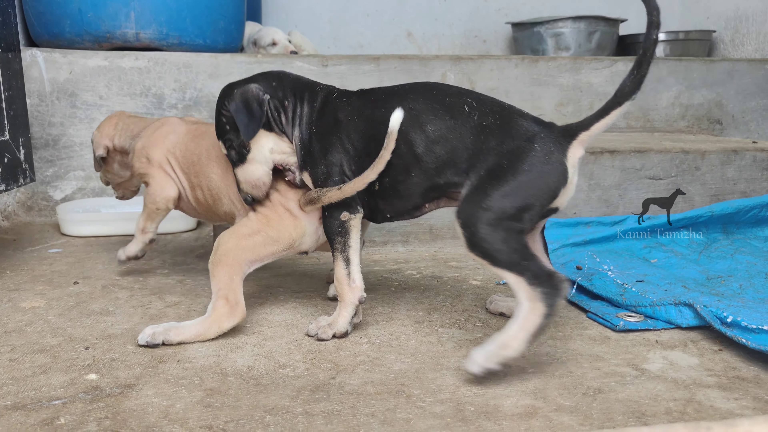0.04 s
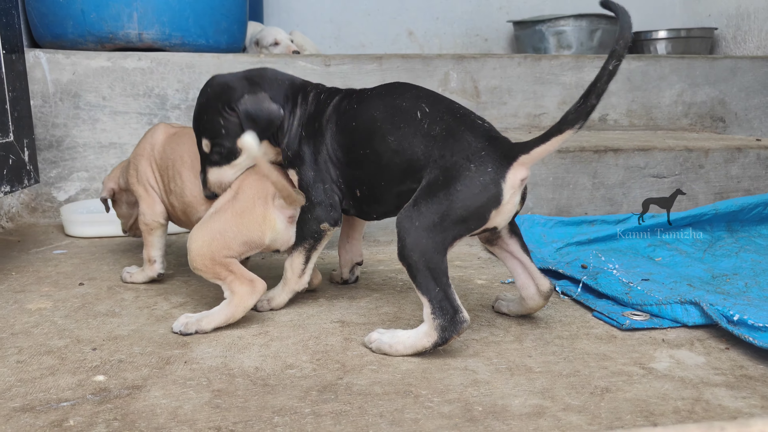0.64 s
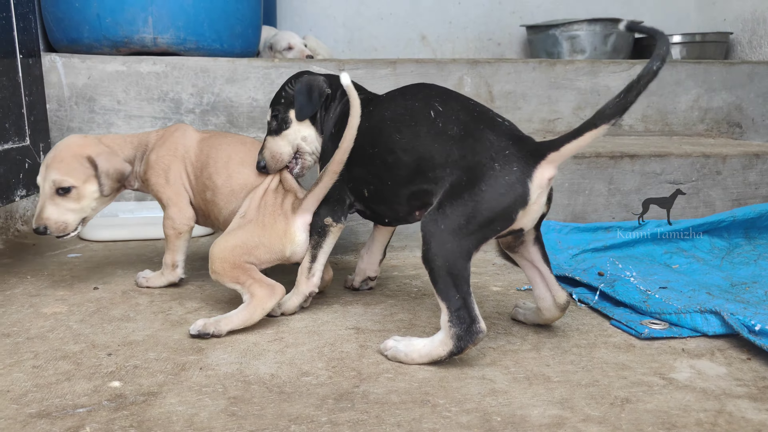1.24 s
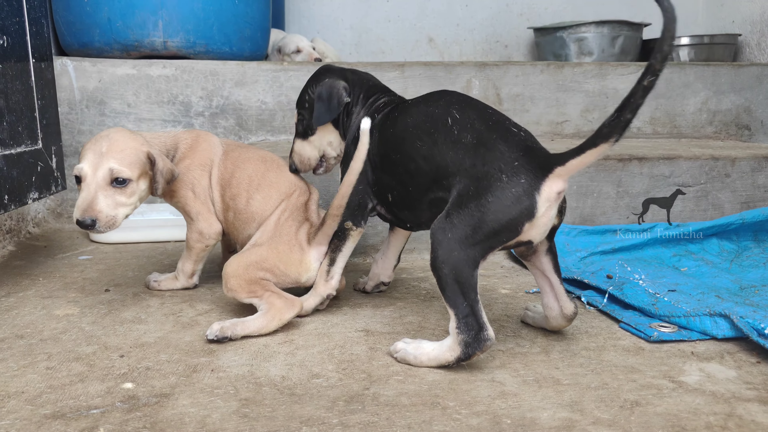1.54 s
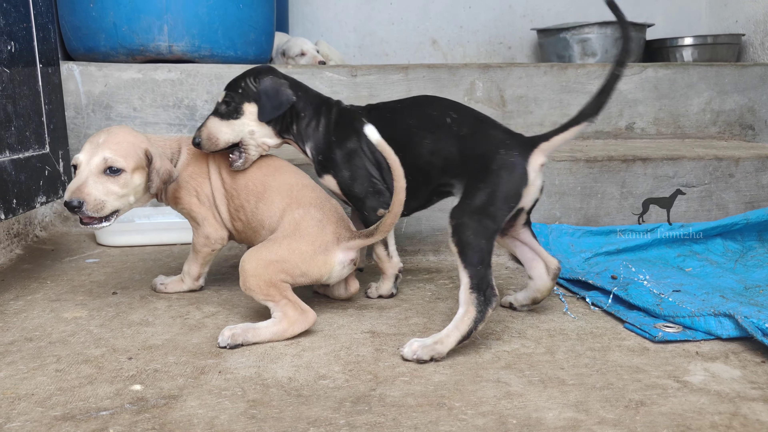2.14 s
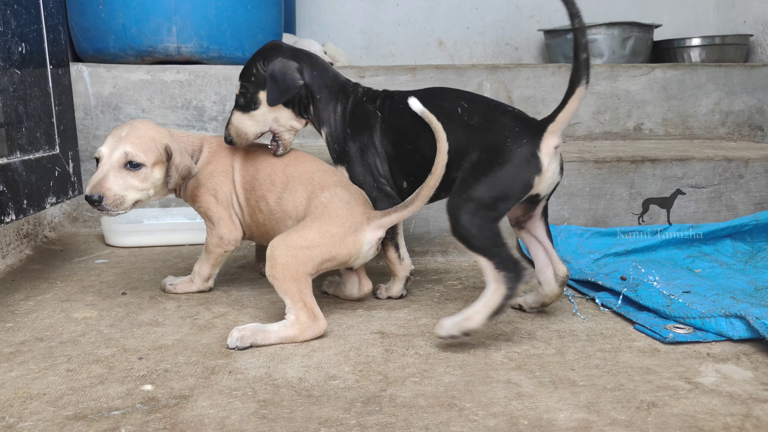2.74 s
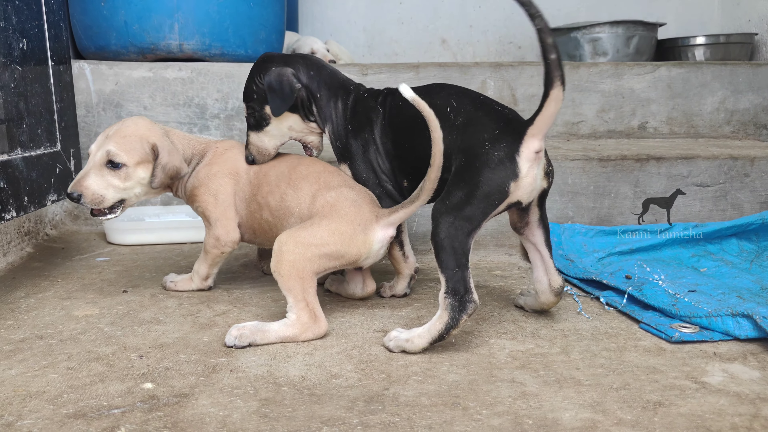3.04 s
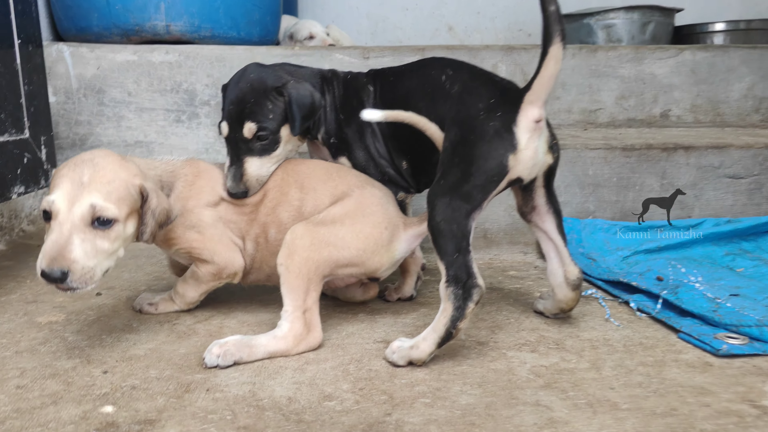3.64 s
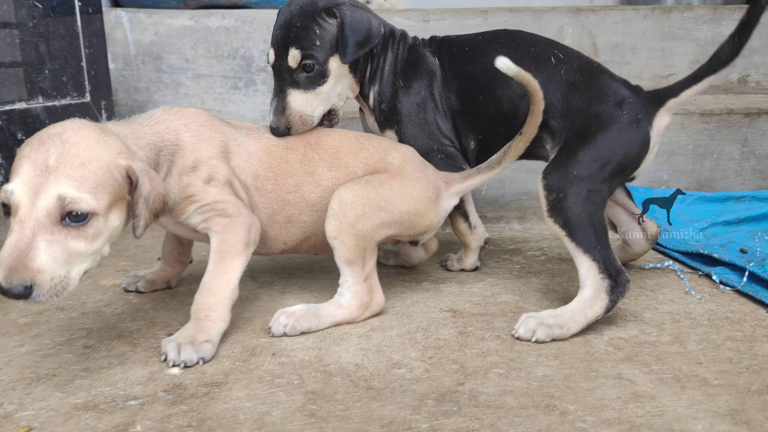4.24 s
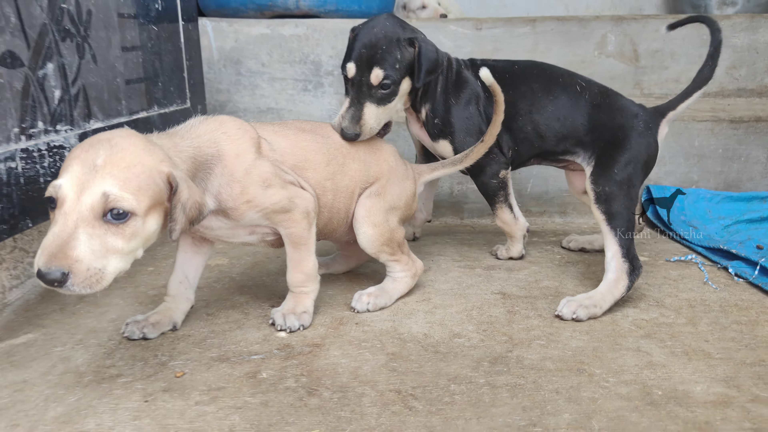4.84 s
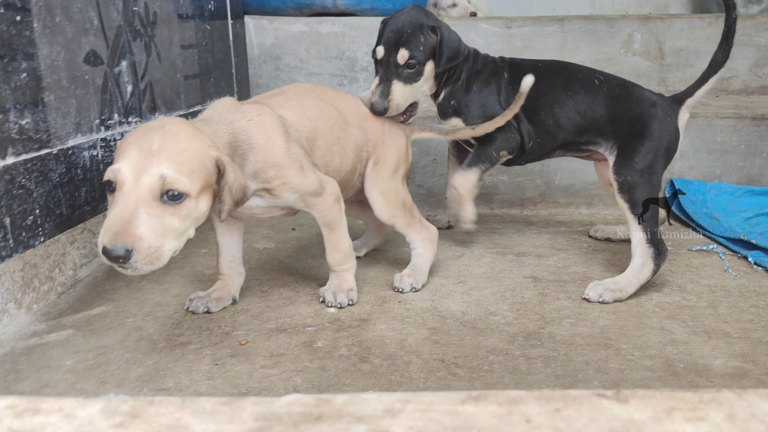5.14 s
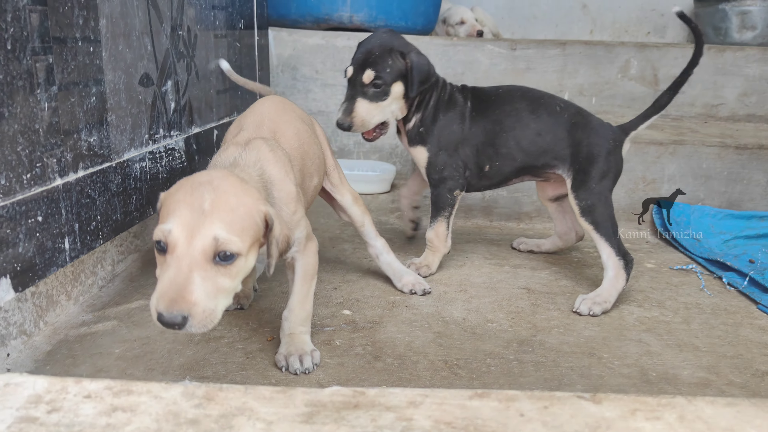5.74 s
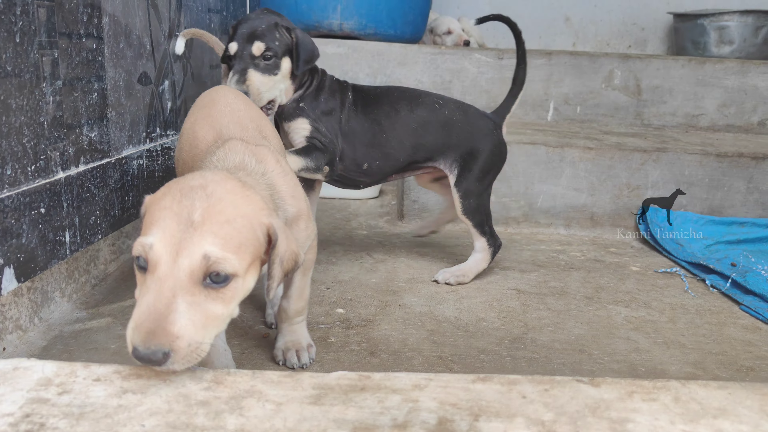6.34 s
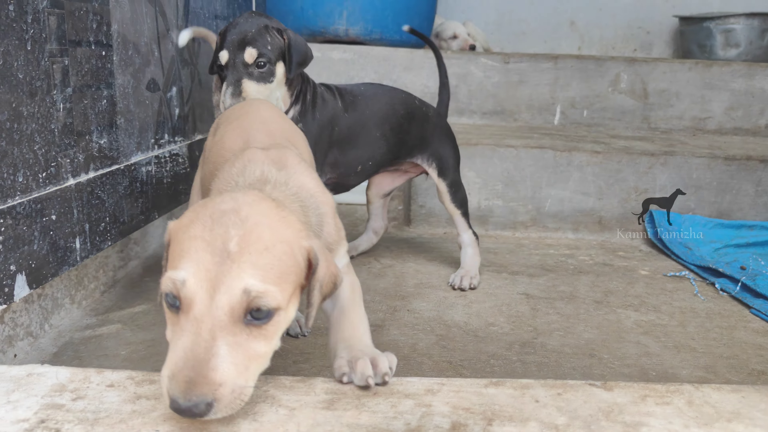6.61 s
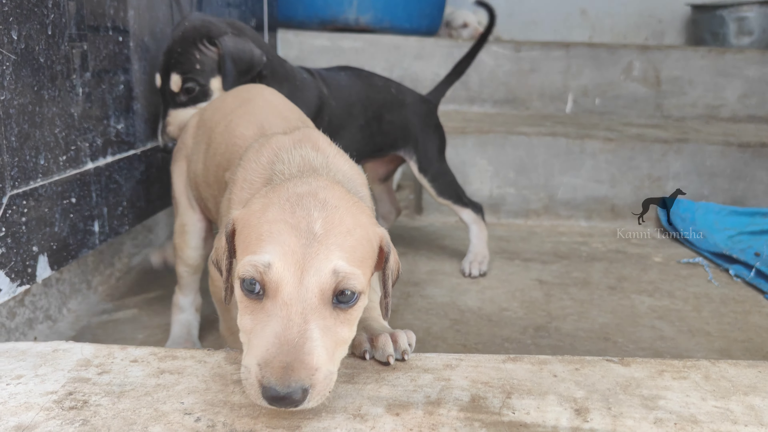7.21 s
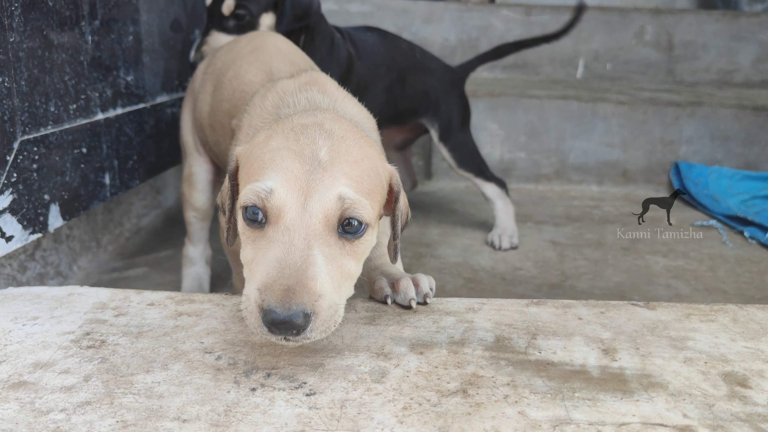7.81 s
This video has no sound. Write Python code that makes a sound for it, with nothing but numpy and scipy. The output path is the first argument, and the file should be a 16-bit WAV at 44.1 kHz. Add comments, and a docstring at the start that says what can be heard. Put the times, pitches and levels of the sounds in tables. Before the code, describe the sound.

Puppies wrestle close to the microphone in a small walled yard. One protests in about a dozen short calls: shrill, rasping yaps first, then a growl, a yelp and a bark, and finally a run of lower growls, the last one louder. Claws tick and paws scuff lightly on the concrete now and then. The bare walls ring briefly after each sound, over a faint rumble and hiss.

```python
"""A small walled yard with a concrete floor: two puppies wrestle close to a two-port microphone.
One protests in a dozen calls, shrill rasping yaps at first, then lower growls. Its vocal folds and
puffs of breath are the source; chest, pharynx, mouth and muzzle are the filters. Claws tick by impact
and paws scuff by friction. The bare walls ring after every sound, over a faint rumble and hiss."""
import sys
import numpy as np
from scipy import signal
from scipy.fft import rfft, irfft
from scipy.io import wavfile
from scipy.ndimage import uniform_filter1d, minimum_filter1d

SR = 44100
rng = np.random.default_rng(int(sys.argv[2]) if len(sys.argv) > 2 else 0)


def persist_wave(psi):
    """Save psi, clipped to +-1, as 16-bit WAV."""
    counts = np.round(np.clip(psi, -1, 1) * 32767).astype(np.int16)
    wavfile.write(sys.argv[1], SR, np.atleast_2d(counts).T)


N = 347067


def amp(db):
    """Decibels to amplitude ratio."""
    return 10 ** (np.asarray(db) / 20)


def unit(x):
    """Normalisation to rms 1."""
    return x / np.sqrt(np.mean(x ** 2) + 1e-20)


def steady(x, size=1100):
    """Normalisation by a running rms, too slow to flatten single pulses."""
    return x / np.sqrt(uniform_filter1d(uniform_filter1d(x ** 2, size), size) + 1e-14)


def wobble(length, size):
    """Low-passed noise: a smooth wandering of rms 1."""
    return unit(uniform_filter1d(uniform_filter1d(rng.standard_normal(length), size), size))


def read(points, hz):
    """Interpolation on a log-frequency axis."""
    f, value = np.transpose(points)
    return np.interp(np.log(hz + 1), np.log(f + 1), value)


def add(mix, start_s, sound):
    """Superposition of a sound on the mix."""
    part = mix[max(round(start_s * SR), 0):][:len(sound)]
    part += sound[:len(part)]


def colour(x, points, size=2048):
    """Minimum-phase filter with the given spectrum."""
    log_gain = np.log(amp(read(points, abs(np.fft.fftfreq(size, 1 / SR)))))
    taps = np.fft.ifft(np.exp(np.conj(signal.hilbert(log_gain)))).real
    return signal.oaconvolve(x, taps[:size // 2])[:len(x)]


def cut(x, hz, kind, order=4):
    """Maximally flat low-pass or high-pass."""
    return signal.sosfilt(signal.butter(order, hz, kind, fs=SR, output="sos"), x)


def resonate(x, hz, width_hz):
    """Damped resonator of gain 1, whose centre frequency may move."""
    turn = np.exp(2j * np.pi * np.cumsum(hz * np.ones(len(x))) / SR)
    pole = np.exp(-np.pi * width_hz / SR)
    return 2 * (turn * signal.lfilter([1 - pole], [1, -pole], x / turn + 1e-18)).real


def bursts(impulses, decay_s):
    """Exponential decay: each impulse starts a fading burst of noise."""
    envelope = signal.lfilter([1], [1, -np.exp(-1 / (decay_s * SR))], impulses)
    return envelope * rng.standard_normal(len(impulses))


def train(place, force, size):
    """Band-limited impulses: windowed sincs can fall between samples."""
    near = place.astype(int)[:, None] + np.arange(-7, 9)
    offset = near - place[:, None]
    clicks = force[:, None] * np.sinc(offset) * np.sinc(offset / 8)
    return unit(np.bincount(np.clip(near, 0, size - 1).ravel(), clicks.ravel(), size))


# Diffuse sound at the two ports. Each row: frequency in Hz, left-right correlation.
COHERENCE = [(30, 0.28), (130, 0.99), (200, 0.86), (400, 0.9), (800, 0.48), (1400, 0), (16000, 0.48)]


def diffuse(size):
    """Spatial coherence: close ports hear long waves more alike than short ones."""
    common, separate = rfft(rng.standard_normal((2, size)))
    same = np.clip(read(COHERENCE, np.fft.rfftfreq(size, 1 / SR)), -1, 1)
    return irfft(np.array([common, same * common + np.sqrt(1 - same ** 2) * separate]), size)


# Outdoor background. Each row: frequency in Hz, relative spectral density in dB.
AIR_SPECTRUM = [(15, -31.5), (25, -5.5), (70, -6.5), (134, -18), (161, -7), (249, -14), (354, -20),
                (416, -31), (531, -21), (936, -35.5), (2550, -30), (2840, -32.5), (3520, -29.5),
                (16000, -50)]
# Its slow drift. Each row: time in seconds, hiss gain in dB, rumble gain in dB.
AIR_DRIFT = [(0, 2, -3), (1.2, 2, -4.5), (2, 7.5, 5.5), (2.6, 3, -3), (3.7, 8.5, -1.5), (5, 0.5, -1.5),
             (5.9, 1, 1), (7.3, 0.5, 2)]


def air(level_db=-56.5, crossover_hz=900):
    """Ambient noise: a diffuse field whose rumble and hiss drift separately."""
    hz = np.fft.rfftfreq(N, 1 / SR)
    noise = unit(irfft(rfft(diffuse(N)) * amp(read(AIR_SPECTRUM, hz)), N))
    hiss = irfft(rfft(noise) * hz ** 4 / (hz ** 4 + crossover_hz ** 4), N)
    rumble = noise - hiss
    when, *levels = np.transpose(AIR_DRIFT)
    hiss_db, rumble_db = (np.interp(np.arange(N) / SR, when, level) for level in levels)
    return amp(level_db) * (amp(hiss_db) * hiss + amp(rumble_db) * rumble)


# The yard's ring. Each row: frequency in Hz, time to fall 60 dB in seconds.
REVERB_TIMES = [(150, 0.35), (300, 0.45), (700, 0.36), (2000, 0.38), (5000, 0.34), (9000, 0.17),
                (15000, 0.44)]
# Floor and near walls. Each row: left delay in seconds, right delay in seconds, relative gain.
REFLECTIONS = [(.0013, 0.0017, 1), (.0041, .0047, 0.58), (.0079, 0.0089, 0.87), (0.0099, .0114, 0.15),
               (0.017, .0172, 0.23)]


def yard(x, send, tail_db=-2.5, walls_db=-1, build_s=0.0064, port_lag_s=0.00014):
    """Reverberation: x arrives directly, left port first; send feeds reflections and a diffuse tail."""
    hz, t, spectra = signal.stft(diffuse(SR), SR, nperseg=256)
    decay = amp(-60 * t / read(REVERB_TIMES, hz)[:, None])
    tail = signal.istft(spectra * decay, SR, nperseg=256)[1][:, :SR]
    tail *= 1 - np.exp(-(np.arange(SR) / SR / build_s) ** 2)
    response = amp(tail_db) * tail / np.linalg.norm(tail[0])
    for left, right, gain in REFLECTIONS:
        response[[0, 1], [round(left * SR), round(right * SR)]] += gain * amp(walls_db)
    direct = np.array([x, np.pad(x, (round(port_lag_s * SR), 0))[:N]])
    return 0.78 * direct + signal.fftconvolve(send[None], response, axes=1)[:, :N]


# Claws on concrete. Each row: time in seconds, relative peak in dB, resonance in Hz.
CLAW_TICKS = [(0.4194, -34, 4270), (0.7811, -39, 5370), (0.833, -43, 7000), (3.5294, -72.5, 4300),
              (4.339, -34, 3020), (4.958, -47, 2185), (5.022, -51, 1916), (5.1374, -20.5, 2570),
              (6.464, -29, 4410), (6.6017, -47, 5750), (7.256, -39.5, 1234)]
# The spectrum of a tick. Each row: frequency in Hz, gain in dB.
CLAW_SPECTRUM = [(100, -16), (450, 0), (800, -17.5), (1400, -5), (2900, -3.5), (4500, -2), (7000, -6),
                 (10000, -13.5), (15000, -8.5)]
# Sliding pads. Each row: start in seconds, length in seconds, relative level in dB.
PAD_SCUFFS = [(0.796, .12, -58.5), (3.501, 0.22, -53.5), (4.149, 0.24, -44.5), (4.825, .13, -73.5),
              (6.452, 0.12, -46.5), (7.183, 0.27, -57)]


def paws(tick_s=0.0063, claw_db=-1, scuff_db=-2, grain_db=4, patter_db=-53, patter_per_s=4):
    """Impact and friction: claws strike the concrete and pads drag grit over it."""
    out, t = np.zeros(N), np.arange(2048) / SR
    for start, db, hz in CLAW_TICKS:
        impact = colour(rng.standard_normal(len(t)) * np.exp(-t / tick_s), CLAW_SPECTRUM)
        tick = .5 * impact + resonate(impact, hz, width_hz=1700)
        add(out, start, amp(db + claw_db) * tick / abs(tick).max())
    grains = rng.standard_normal(N) * amp(grain_db * np.minimum(rng.exponential(1, N), 5))
    grit = unit(colour(grains, [(100, -13.5), (600, -9), (2000, -7.5), (4500, -5.5), (7000, -9),
                                (10000, -22), (15000, -19)]))
    for start, length, db in PAD_SCUFFS:
        progress = np.clip((np.arange(N) / SR - start) / length, 0, 1)
        out += amp(db + scuff_db) * grit * np.sin(np.pi * progress)
    # tiny bright ticks as the pups shift their feet
    touches = (rng.random(N) < patter_per_s / SR) * rng.random(N)
    return out + amp(patter_db) * cut(bursts(touches, tick_s), 6000, "high", order=2)


def vocal_folds(hz, rough, jitter=.06, shimmer=1.0, subharmonic=0.25, waver=.04, rattle=0.88):
    """Glottal source: one flow pulse and one closing snap a cycle, uneven when the voice is rough."""
    size = len(hz)
    turns = .9 + np.cumsum(hz * (1 + waver * rough * wobble(size, 200))) / SR
    cycle = np.arange(1, int(turns[-1]))
    late, strong = rng.standard_normal((512, 2))[cycle].T
    cycle_rough = np.interp(cycle, turns, rough)
    place = np.interp(cycle + jitter * cycle_rough * late, turns, np.arange(size))
    force = np.exp(cycle_rough * (shimmer * np.clip(strong, -2, 1.4) + subharmonic * (-1) ** cycle))
    # strong cycles close harder, so the treble rattles
    return turns, train(place, force, size), train(place, force ** rattle, size)


# Upper resonances of throat and muzzle with the mouth nearly shut, half open and wide.
# Each row: frequency in Hz, relative gain in dB.
MUZZLE_SHUT = [(1800, -3), (2100, -8), (2600, -23), (3400, -18), (4400, 6.5), (5900, -3.5), (7300, 2),
               (8600, -7), (9300, -8), (10200, -20), (15500, -16.5)]
MUZZLE_HALF = [(1800, -23), (2200, -1), (2600, -12.5), (3200, -6.5), (3700, -1), (4500, 0), (5300, -2.5),
               (5900, -1), (6600, -7.5), (7800, -13), (8800, -29.5), (12000, -37.5), (15500, -27)]
MUZZLE_WIDE = [(1800, -39.5), (2250, -2.5), (2650, -9.5), (3200, -7), (4100, 1.5), (5100, -3), (5900, -8.5),
               (7000, -19), (7900, -24.5), (8800, -50.5), (12000, -61), (15500, -46.5)]


def muzzle(source, effort_db, pitch_hz, third_hz, third_db, nose_db, treble_db):
    """Upper formants: effort widens the mouth and so reshapes the spectrum of the rasp."""
    def formant(hz, width_hz):
        """Two resonators in cascade give steep skirts."""
        return unit(resonate(resonate(source, hz, 2 * width_hz), hz, 2 * width_hz))
    opening = np.interp(effort_db, [-57, -35, -16], [0, 1, 2])
    out = sum(np.maximum(1 - abs(opening - k), 0) * unit(colour(source, shape))
              for k, shape in enumerate([MUZZLE_SHUT, MUZZLE_HALF, MUZZLE_WIDE]))
    # antiresonance: a side cavity of the throat swallows one band
    out -= 0.69 * resonate(out, hz=2620, width_hz=300)
    out += amp(third_db) * np.interp(opening, [0, 1, 2], [.02, .2, .45]) * formant(third_hz, 260)
    # the nose rings most with the mouth half open
    out += amp(nose_db) * np.interp(opening, [0, 1, 2], [.2, .6, .35]) * formant(2280, 110)
    # the fourth formant climbs with the pitch; tongue and lips keep it moving
    fourth_hz = 4750 * (pitch_hz / 400) ** .12 + 260 * wobble(len(source), 3000)
    out += amp(-9) * formant(fourth_hz, 300)
    out = colour(out, [(6500, 0.0091), (12000, treble_db / 2), (15500, treble_db + 3)])
    return cut(out, 1750, "high")


# Chest and pharynx responses. Each row: pitch in Hz, relative level in dB at ordinary loudness.
CHEST_RESPONSE = [(200, -32), (245, -31), (300, -29.5), (340, -33), (420, -45), (500, -54.5), (750, -66.5)]
PHARYNX_RESPONSE = [(200, -38), (235, -37), (290, -39.5), (420, -37.5), (520, -42), (750, -62.5)]


def cavities(chest_drive, pharynx_drive, hz, loud_db, chest_db, pharynx_db, ordinary_db=-30):
    """Forced resonance: chest and pharynx ring when a low harmonic falls on them."""
    chest = cut(cut(chest_drive, 390, "low", order=6), 150, "high", order=10)
    pharynx = cut(cut(pharynx_drive, 680, "low", order=6), 400, "high", order=6)
    chest_gain = amp(read(CHEST_RESPONSE, hz) + chest_db - 3)
    pharynx_gain = amp(read(PHARYNX_RESPONSE, hz) + pharynx_db + 1.5)
    growth = amp(.55 * (loud_db - ordinary_db))
    return growth * (chest_gain * steady(chest) + pharynx_gain * steady(pharynx))


def vowel(drive, loud_db, second_hz, second_db):
    """Two moving formants: the first rises as the jaw drops in a swelling call."""
    first_hz = np.interp(loud_db, [-42, -15], [700, 860])
    first = resonate(drive, first_hz, width_hz=170)
    second = amp(second_db) * resonate(drive, second_hz, width_hz=250)
    return amp(loud_db - 3) * steady(cut(cut(first - second, 520, "high"), 2400, "low"))


# An opening mouth lets out the rasp and lifts formant 2. Each row: opening from 0 to 1,
# rasp gain in dB, formant 2 in Hz, formant 2 gain in dB.
MOUTH_OPENING = [(0, -23, 1250, -9), (.4, -9, 1255, -3.5), (.75, 1.5, 1290, -1), (1, 11.5, 1700, 6.5)]


def call(gesture, start, end, chest_db, pharynx_db, second_db, *muzzle_posture,
         breathy=0.26, spit=0.62, flutter_db=5, attack_s=.018, release_s=.025):
    """Source-filter principle: fold pulses and turbulent puffs excite the vocal tract."""
    t = np.arange(start, end, 1 / SR)
    when, *curves = np.transpose(gesture)
    hz, loud_db, mouth, rough = (np.interp(t, when, curve) for curve in curves)
    opening, *laws = np.transpose(MOUTH_OPENING)
    rasp_db, second_hz, lift_db = (np.interp(mouth, opening, law) for law in laws)
    turns, pulses, snaps = vocal_folds(hz, rough)
    puffs = unit(bursts(snaps, decay_s=0.00059))
    drive = pulses + breathy * rough * puffs
    # the smooth part of the air flow strengthens the fundamental, less so when rough
    flow = 0.63 * (1 - .45 * rough) * np.sqrt(hz / SR) * np.cos(2 * np.pi * turns)
    chest_drive = drive + flow + .9 * rough * puffs
    voice = cavities(chest_drive, pulses + flow, hz, loud_db, chest_db, pharynx_db)
    voice += vowel(drive, loud_db, second_hz, lift_db + second_db)
    # loose wet tissue flutters, breaking a low growl's rasp into bursts
    flutter = amp(flutter_db * rough * 300 / hz * np.clip(wobble(len(t), 300), -2, 1.5))
    effort_db = loud_db + rasp_db + 9 * np.log2(hz / 330)
    rasp = steady(muzzle(snaps + spit * puffs, effort_db, hz, *muzzle_posture))
    voice += amp(loud_db + rasp_db - 2) * flutter * rasp
    fade = np.clip(np.minimum((t - start) / attack_s, (end - t) / release_s), 0, 1)
    return voice * np.sin(np.pi / 2 * fade) ** 2


# The pup's posture in each call. Each row: start and end in seconds; chest, pharynx and formant 2
# gains in dB; formant 3 in Hz; formant 3, nose, top treble and echo gains in dB; left over right in dB.
CALL_POSTURES = [(0, .245, -3, -1.5, -4, 3570, -4, -14, -6.5, -3, 2.5),
                 (1.231, 1.658, -11, 2.5, -5, 3556, 3, -15.5, -11, -2.5, 1.5),
                 (1.827, 2.285, 2, -2, 3, 3367, -3, -7, -6.5, 0.5, 1.5),
                 (2.65, 3.036, -6.5, -1.5, 2, 3610, -0.5, -16, -18, 0.5, 1),
                 (3, 3.182, -2.5, 2, 0.5, 2890, 1, -4, 0.5, -0.5, 3.5),
                 (3.172, 3.399, -5, 0.5, -1, 3540, 1, -7, -9, -2, 2.5),
                 (3.808, 4.195, -4.5, 3.5, 2.5, 2963, 2, -9.5, -0.5, 1, -0.5),
                 (4.472, 4.827, 1, -1, 0, 3836, -4, -23, -3, -0.5, 0),
                 (5.257, 5.703, -2, -1.5, 2.5, 3920, -1, -27, -3, 0, 1.5),
                 (5.964, 6.37, -0.5, -0.5, 2, 3900, -6, -18, -18, -4.5, -1),
                 (6.775, 7.173, 1.5, -2.5, 1.5, 3020, 6.5, -5, -3.5, -3.5, -1),
                 (7.452, 7.875, 0.5, -7, 6, 3010, 2, -2, 6, -1.5, -1)]
# One list per call: three yaps, a growl, a yelp, a snarl, a bark, then five growls.
# Each row: time in seconds, pitch in Hz, loudness in dB, mouth opening and roughness from 0 to 1.
CALL_GESTURES = [
    [(.02, 365, -26.5, 0.03, 0.65), (.048, 428.5, -8, 0.73, 0.46), (.09, 561, -21, 0.94, 0.59),
     (.15, 777.4, -21, 1, 0.7), (.19, 1018, -19.5, 1, 0.87), (.23, 725.4, -27.5, 0.96, .5)],
    [(1.245, 300.2, -37.5, 0, .3), (1.268, 345, -28.5, 0.07, 0.37), (1.31, 298.7, -27, .6, 0.96),
     (1.385, 411.2, -30.5, 0.3, 0.57), (1.432, 442, -16.5, 0.88, 0.71), (1.5, 642.4, -17, 0.84, 0.71),
     (1.55, 431.6, -24.5, 0.77, 0.74), (1.59, 336, -35, 0.5, 0.44), (1.63, 307.6, -36, 0.3, 0.34)],
    [(1.84, 311, -29, 0.58, .57), (1.868, 430, -15, .8, 0.59), (1.915, 470, -17, 0.9, .6),
     (1.97, 320.8, -34.5, 0.56, .4), (2.025, 240.3, -31.5, 0.84, 0.28), (2.09, 530.4, -15.5, 0.85, 0.65),
     (2.14, 462.6, -19.5, 0.8, .68), (2.2, 326.6, -25, 0.65, .17), (2.275, 316.2, -28.5, 0.6, 0.42)],
    [(2.665, 228.9, -38.5, .55, 0.79), (2.71, 289.7, -34.5, 0.59, 0.62), (2.78, 234.1, -32.5, 0.77, 0.49),
     (2.91, 223.1, -40.5, 0.07, 0.34), (3.01, 243, -38.5, 0.18, 0.47)],
    [(3.03, 264.3, -36, .48, 0.6), (3.06, 361, -32, .45, 0.4), (3.082, 431.6, -17, 0.4, 0.18),
     (3.125, 439, -16, 0.37, .17), (3.146, 385.4, -28.5, 0.75, .55)],
    [(3.195, 401.6, -25.5, 0.75, .85), (3.26, 339.4, -26.5, 0.84, 0.22), (3.31, 313.3, -25, 0.74, .4),
     (3.365, 274.4, -27.5, 0.42, 0.73)],
    [(3.818, 249.9, -30, 0.59, 0.72), (3.843, 389, -18, 0.71, 0.41), (3.89, 501.8, -19.5, 0.79, 0.24),
     (3.965, 340.9, -26, 0.69, 0.37), (4.025, 384.7, -24, 0.58, 0.45), (4.1, 307.3, -29.5, 0.54, 0.71),
     (4.18, 215.4, -41.5, 0.23, 0.55)],
    [(4.485, 212, -38.5, 0.5, 0.69), (4.55, 305.1, -26.5, 0.63, 0.3), (4.62, 264.7, -32.5, .68, 0.45),
     (4.7, 243.7, -29, 0.56, 0.51), (4.79, 232.4, -37, 0.22, 0.51)],
    [(5.275, 198.4, -46, 0.2, 0.73), (5.34, 222.8, -39.5, 0.17, 0.68), (5.435, 216.3, -40.5, 0.25, 0.59),
     (5.525, 228.5, -33, 0.26, 0.46), (5.6, 222, -38.5, 0.18, .42), (5.69, 201.9, -50, 0.4, 0.4)],
    [(5.99, 197.4, -43, .15, 0.85), (6.06, 194.2, -41.5, 0.3, 0.3), (6.13, 210.5, -37.5, 0.19, 0.05),
     (6.21, 207.4, -37, 0.28, 0.25), (6.295, 216.9, -34, .42, 0.63), (6.345, 206, -38.5, 0.26, 0.44)],
    [(6.785, 214.2, -33, .58, 0.69), (6.83, 267.1, -27, 0.61, 0.59), (6.9, 217, -31.5, 0.55, 0.8),
     (7.05, 204.2, -36.5, .22, 0.55), (7.155, 197.4, -40, 0.35, 0.58)],
    [(7.465, 185, -41, 0, 0.68), (7.482, 225.5, -36, 0.33, 0.62), (7.497, 260.7, -17, 0.53, 0.54),
     (7.553, 289.2, -26.5, 0.72, 0.59), (7.615, 226.7, -25.5, 0.65, 0.63), (7.7, 232.2, -28.5, 0.53, 0.49),
     (7.775, 253.5, -18.5, 0.54, 0.5), (7.84, 266.7, -25.5, .55, 0.46)],
]
# The ports' unequal response to the voice. Each row: frequency in Hz, right over left in dB.
PORT_DIFFERENCE = [(100, -4.5), (700, 0.35), (1300, 0.5), (2500, 3.5), (5700, -0.5), (6800, 18.5),
                   (7800, 12), (9500, 6), (15000, 1.5)]


def puppy():
    """Direct and reflected sound: the calls fill the yard; the right port hears more of their top."""
    voice, send = np.zeros(N), np.zeros(N)
    for gesture, (start, end, *posture, echo_db, _) in zip(CALL_GESTURES, CALL_POSTURES):
        sound = call(gesture, start, end, *posture)
        add(voice, start, sound)
        add(send, start, amp(echo_db) * sound)
    starts, *_, balances = np.transpose(CALL_POSTURES)
    balance_db = np.interp(np.arange(N) / SR, starts, balances)
    ports = []
    for arrival, side in zip(yard(voice, send), (1, -1)):
        response = [(hz, -side * db / 2) for hz, db in PORT_DIFFERENCE]
        ports.append(amp(side * balance_db / 2) * colour(arrival, response))
    return np.array(ports)


def scene():
    """Superposition: voice, paws and outdoor air add at the two ports."""
    calls, feet = puppy(), paws()
    return calls + yard(feet, send=amp(-6.5) * feet) + air()


def record(dry, edge_hz=15950):
    """Peak limiting turns down anything over full scale; a low-pass then limits the band."""
    headroom = 1 / np.maximum(abs(dry).max(0), 1)
    gain = uniform_filter1d(minimum_filter1d(headroom, size=201), size=201)
    low_pass = signal.firwin(511, edge_hz, window=("kaiser", 9), fs=SR)
    return signal.oaconvolve(dry * gain, low_pass[None], "same")


dry = scene()
out = record(dry)
persist_wave(out)
```